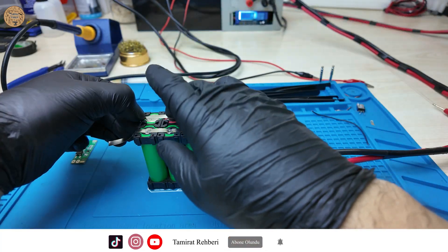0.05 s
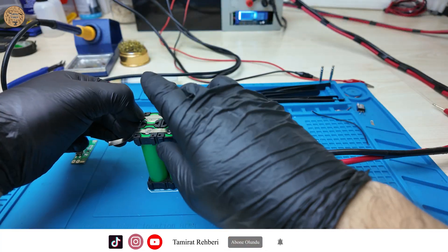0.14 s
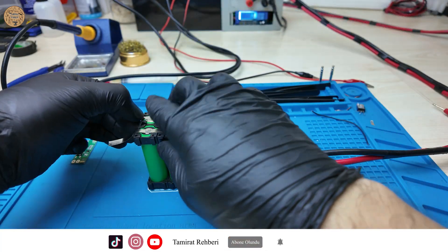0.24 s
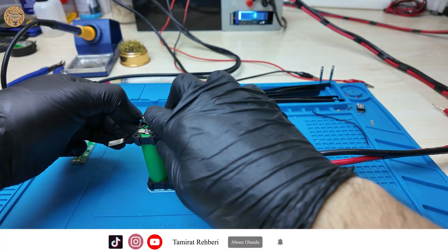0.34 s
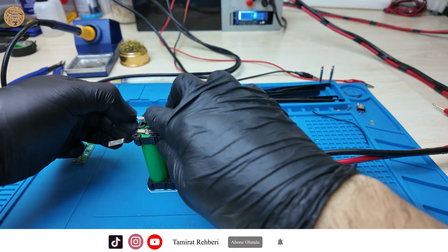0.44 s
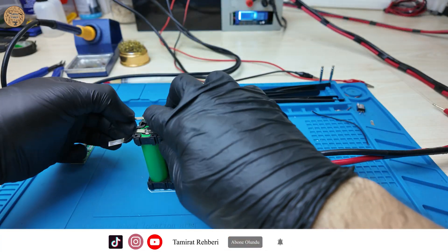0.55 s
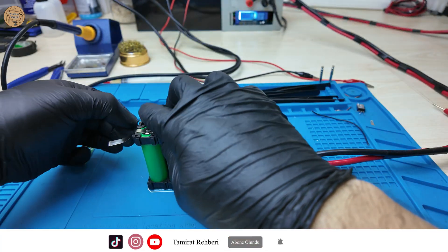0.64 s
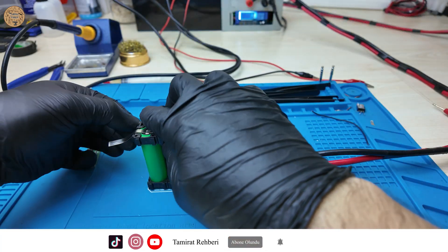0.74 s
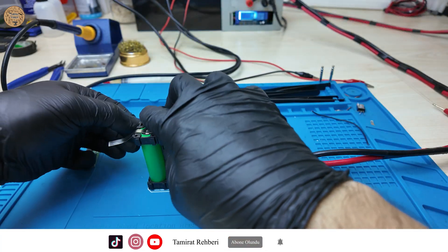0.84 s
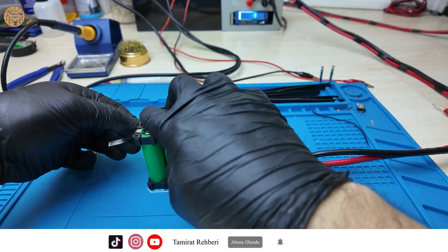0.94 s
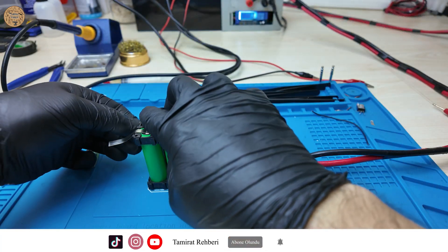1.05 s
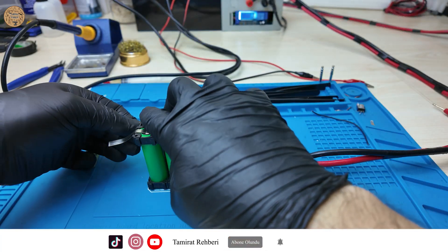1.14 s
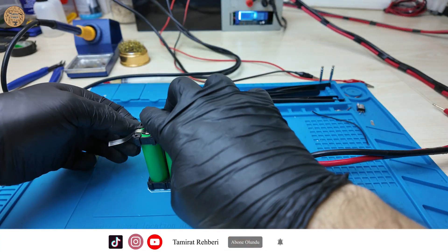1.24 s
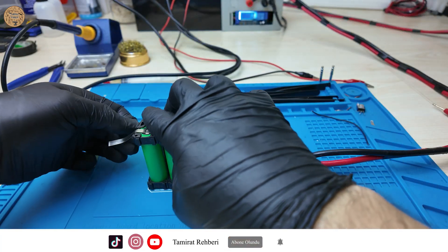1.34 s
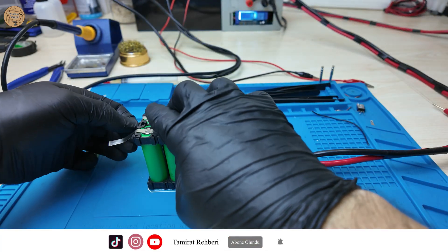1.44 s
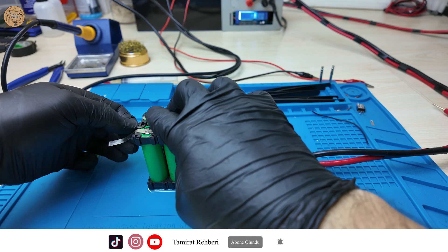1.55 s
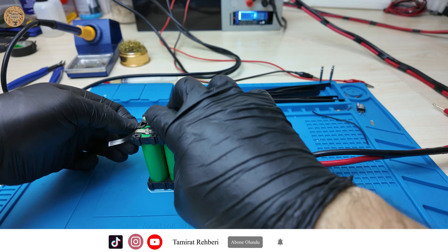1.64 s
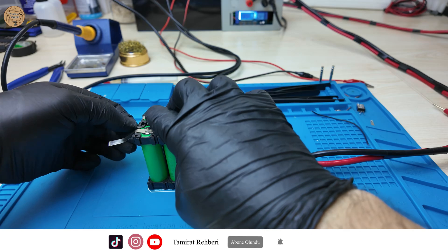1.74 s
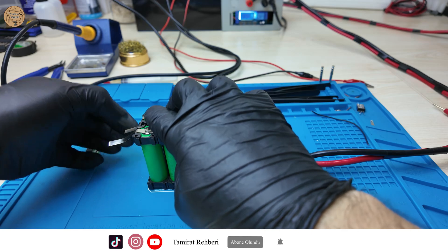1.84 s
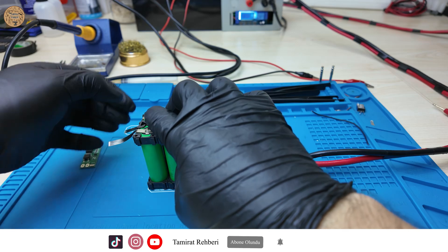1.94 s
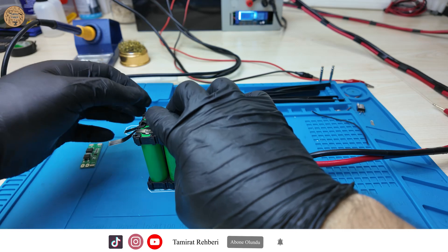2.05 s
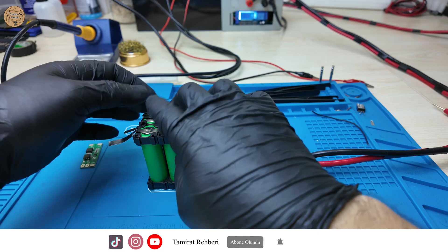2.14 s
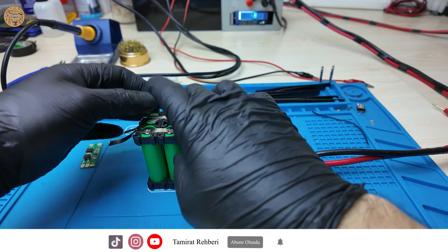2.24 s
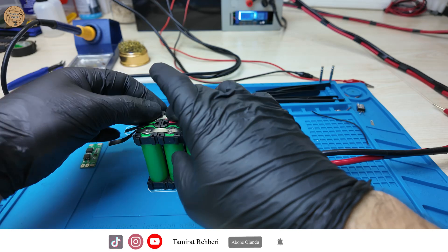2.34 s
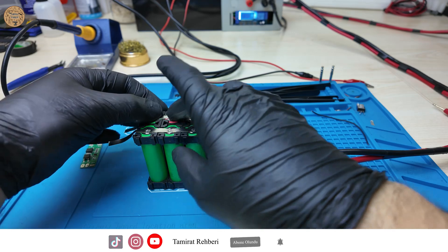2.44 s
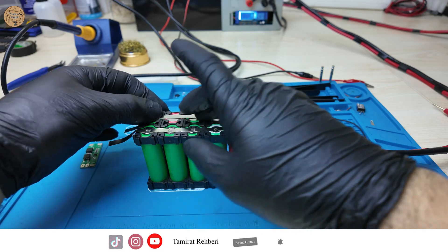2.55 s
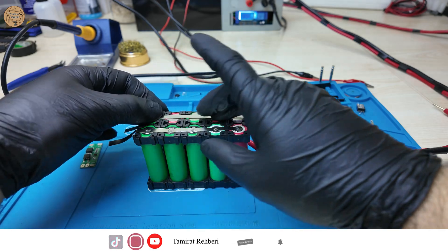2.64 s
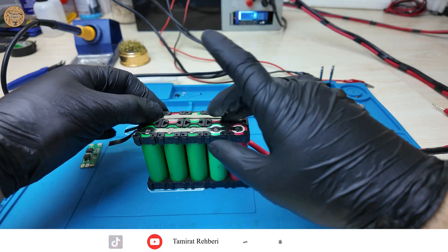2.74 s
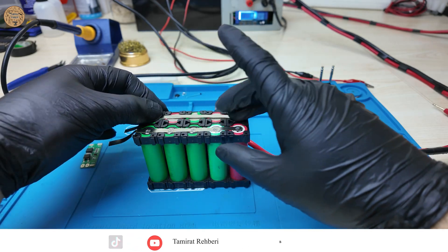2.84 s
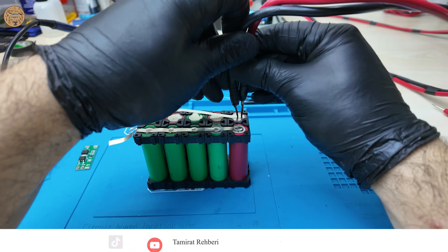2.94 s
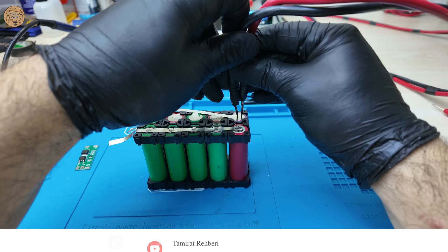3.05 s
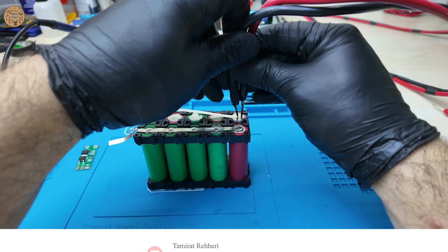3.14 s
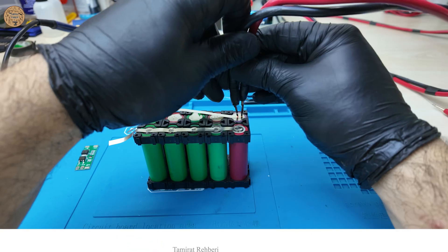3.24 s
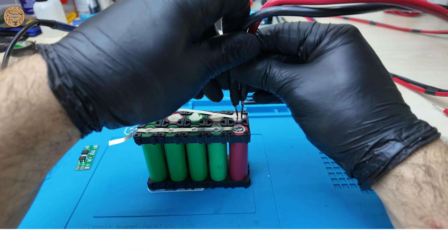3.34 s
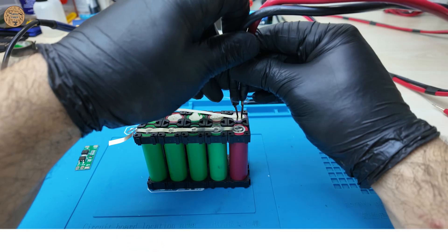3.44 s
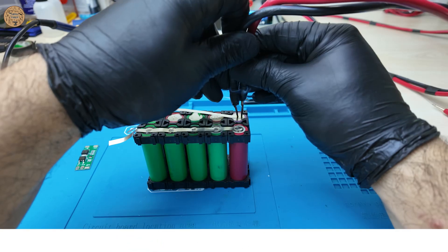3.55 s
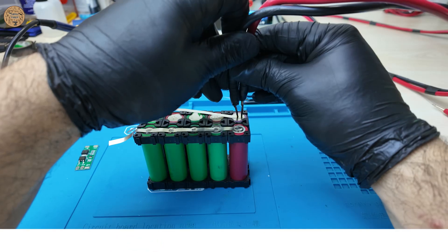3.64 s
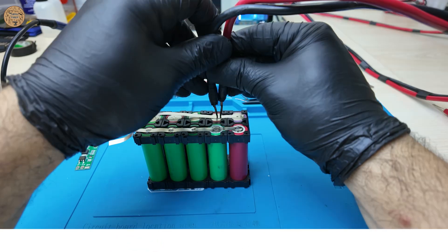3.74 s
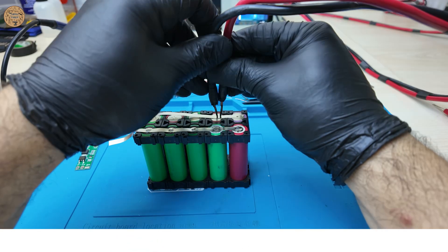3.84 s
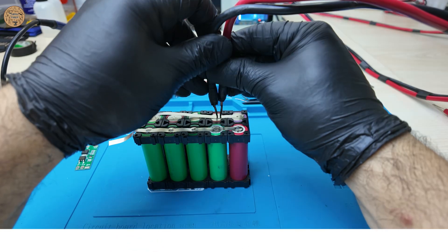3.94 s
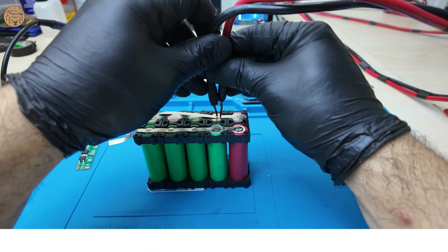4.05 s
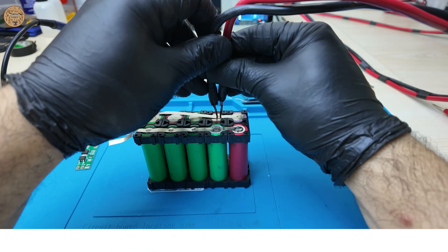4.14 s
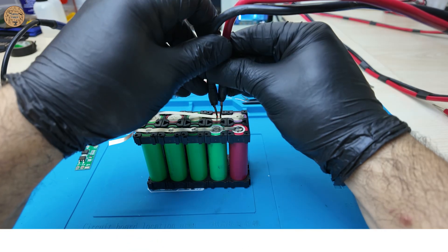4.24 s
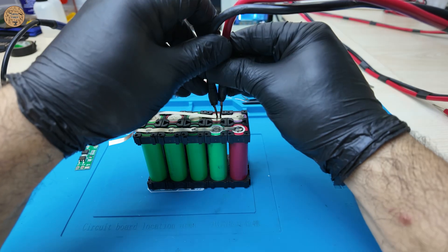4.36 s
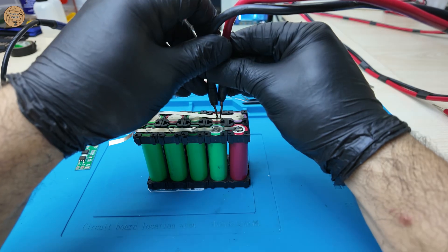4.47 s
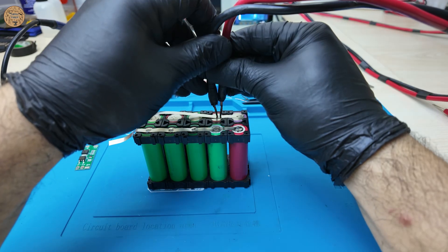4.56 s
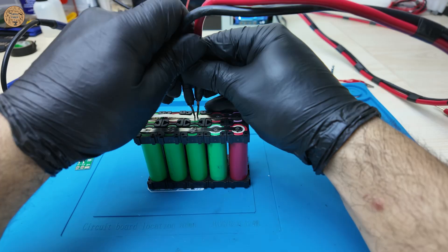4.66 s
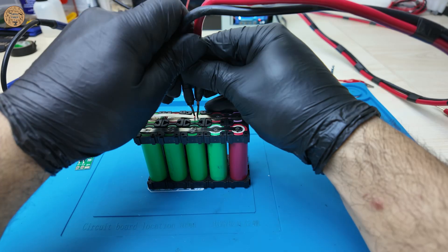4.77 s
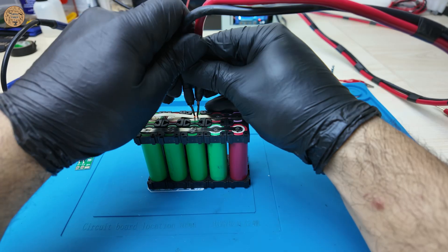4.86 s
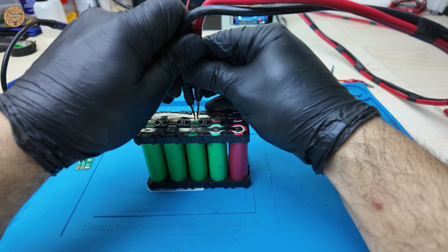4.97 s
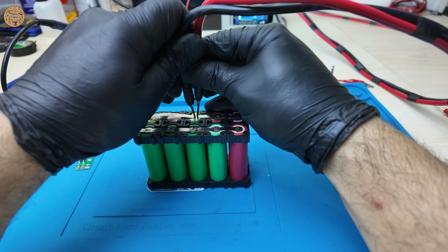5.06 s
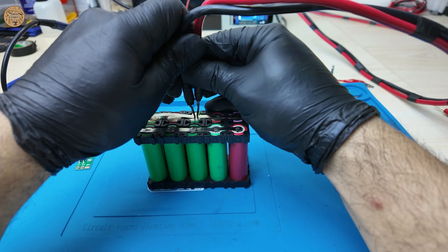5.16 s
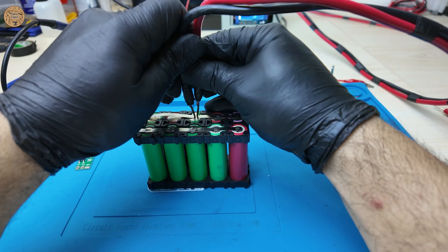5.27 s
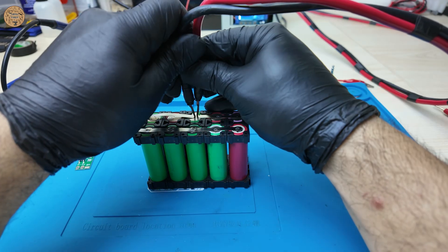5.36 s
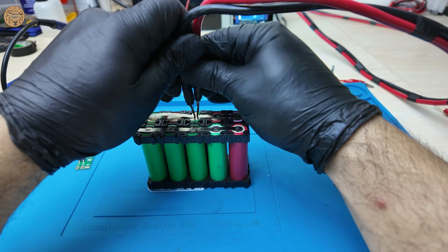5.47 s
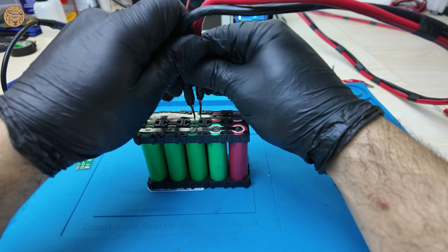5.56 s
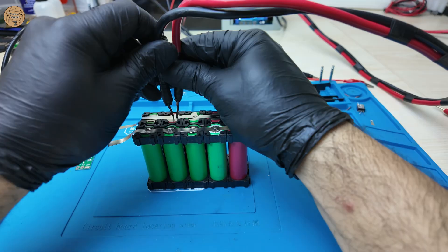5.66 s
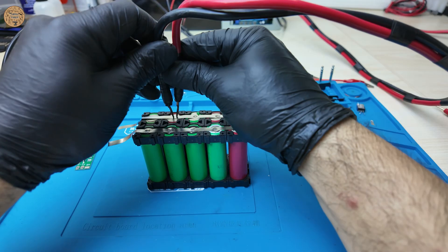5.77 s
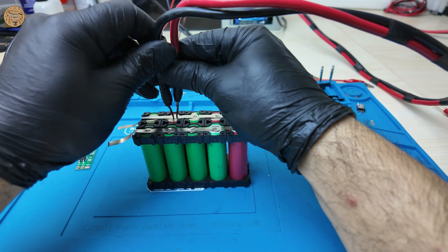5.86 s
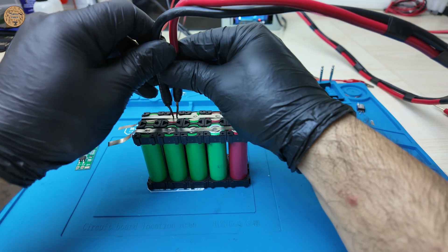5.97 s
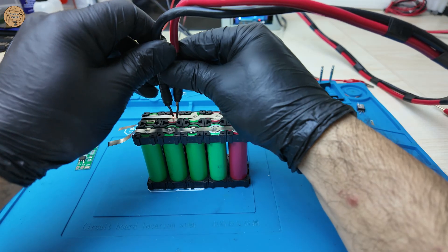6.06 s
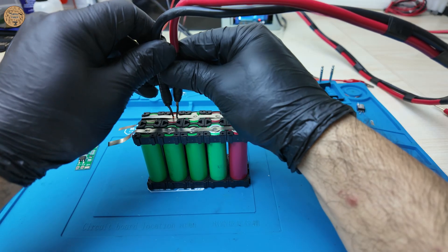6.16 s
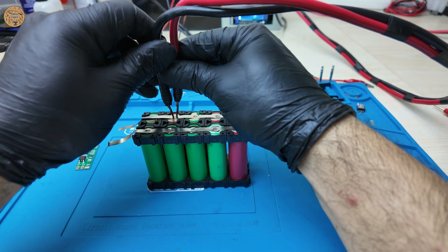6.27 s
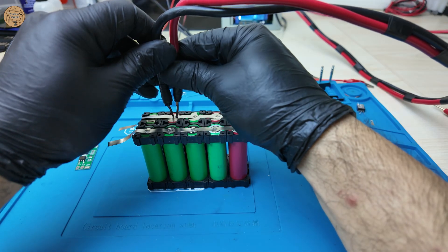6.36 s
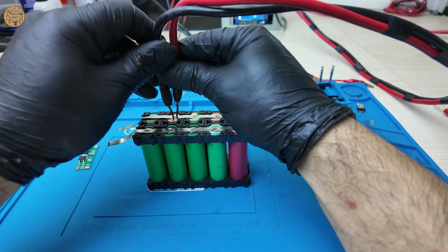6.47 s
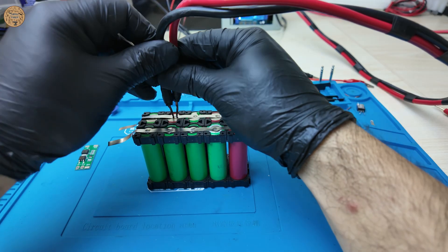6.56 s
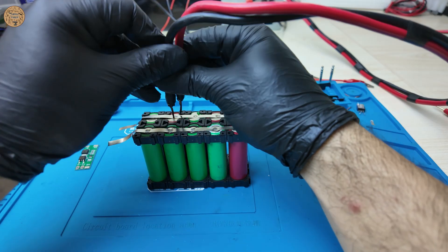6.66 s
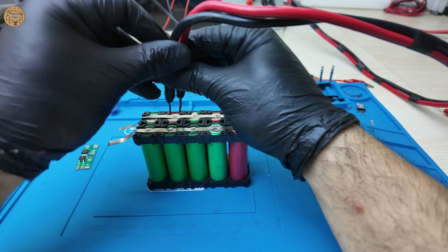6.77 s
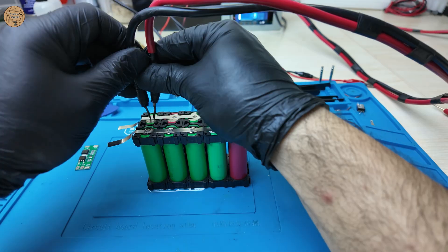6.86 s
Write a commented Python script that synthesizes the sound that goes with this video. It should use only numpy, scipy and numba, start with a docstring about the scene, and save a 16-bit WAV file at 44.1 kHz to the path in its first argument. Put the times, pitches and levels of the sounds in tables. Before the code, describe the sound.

Over steady fan hum and faint glove rubs, a foot-worked spot welder clacks four times, its metal switch cabinet banging shut and open twice per weld.

```python
"""A fan hums while gloves rustle and probes tick on a metal strip; then a bench spot welder is worked by foot.
Per weld a pedal clacks down and up, its spring pings, and a contactor slams shut and open twice.
Fan: shaped noise, wavering narrow bands, two whines. Gloves: grainy noise. Probes: short fading noise.
Pedal, spring and contactor cabinet: decaying modes plus fading noise, heard in a small workshop."""
import sys
import numpy as np
from scipy import signal
from scipy.fft import rfft, irfft
from scipy.io import wavfile
from scipy.ndimage import uniform_filter1d
from numba import njit

SR = 44100
rng = np.random.default_rng(int(sys.argv[2]) if len(sys.argv) > 2 else 0)


def persist_wave(psi):
    """Save psi, clipped to +-1, as 16-bit WAV."""
    counts = np.round(np.clip(psi, -1, 1) * 32767).astype(np.int16)
    wavfile.write(sys.argv[1], SR, np.atleast_2d(counts).T)


N = 304621

# Fan air spectrum: freq_hz, density_db_per_hz
FAN_AIR_SPECTRUM = [(12, -48), (20, -18), (110, -10.5), (155, -12.5), (270, -5.5), (351, -4.5), (539, -16),
                    (668, -12.5), (1050, -29), (1240, -24.5), (1500, -30.5), (1690, -29.5), (1820, -31),
                    (2800, -32), (6000, -52), (7800, -54), (13200, -120)]
# Wavering fan tones: freq_hz, width_hz, level_db
FAN_TONES = [(31.1, 1.3, -63.5), (177, 2.7, -59), (300.5, 24, -60.5), (341.6, 13.3, -54), (361.6, 6.3, -55),
             (450.8, 16, -59), (496, 13, -64.5), (597, 11, -65.5), (666.6, 31, -60), (1950, 4.2, -98)]
# Motor whines: freq_hz, level_db
FAN_WHINES = [(1260, -67.5), (1707, -71.5)]
FAN_AIR_DB = -49.5

# Glove rustle spectrum: freq_hz, density_db_per_hz
GLOVE_RUSTLE_SPECTRUM = [(4120, -20), (7000, -2.5), (8040, -1.5), (10100, -1), (16000, -20.5)]
# Glove creak spectrum: freq_hz, density_db_per_hz
GLOVE_CREAK_SPECTRUM = [(1500, -30), (3000, 2), (4500, -2.5), (5900, 0.5),
                        (7500, -8), (10000, -24), (12200, -11), (14500, -30)]
# Glove rubs: loudest_s, level_db, creak_re_rustle_db, length_s
GLOVE_RUBS = [(.043, -63.5, -5, 0.032), (0.359, -58, -9, 0.12), (0.426, -66, -4, 0.027),
              (.725, -76, -5, .02), (0.817, -78, 0, .04), (.9, -79, 4, .2), (1.285, -80, 8, .05),
              (1.42, -74, 11, 0.053), (1.49, -79, 5, .05), (1.545, -78, 7, .04), (1.73, -81, 3, .08),
              (1.895, -70.5, 5, 0.063), (1.953, -74, 4, .07), (2.035, -74, 9, .07), (2.102, -78, -2, 0.088),
              (2.279, -64.5, -2, .07), (2.343, -63.5, -5, 0.13), (2.658, -70.5, -3, 0.11),
              (2.732, -75, -2, .05), (2.873, -85, 3, .15), (5.537, -79, 7, 0.1), (5.735, -75, -3, .08),
              (5.796, -52, 8, 0.037), (6.676, -77, 10, .1), (6.735, -72, -3, .04), (6.89, -75, -5, .06)]
RUB_RISE_SHARE, RUB_FADE_DB = 0.47, 16  # share of length spent rising; swell and fall depth
FIDGET_DB = -86.5  # constant floor under the rubs

# Probe tips on the strip: start_s, level_db, dull_re_bright_db
PROBE_TICKS = [(.041, -43, 12), (2.9538, -56, 0), (4.6935, -40, 7), (5.754, -29, 4.5), (5.773, -42, 8),
               (5.7814, -21.5, 7.5), (5.792, -18.5, 2), (6.7173, -26.5, -10), (6.734, -40, 4),
               (6.8783, -57, -3)]

# Welds, two pulses each: switch_click_s, first_close_s, let_go_s, second_pulse_length_s
WELDS = [(3.2072, 3.2735, 3.298, .0647), (4.063, 4.1289, 4.176, .0646), (4.824, 4.8803, 4.9723, .0738),
         (6.0362, 6.1014, 6.1462, .0644)]
FIRST_PULSE_S, SECOND_PULSE_AFTER_S = .1229, .1774  # both from the first closing

# Spring modes: freq_hz, t60_s, level_db
SPRING_MODES = [(4800, 0.0092, -3), (6460, 0.04, -6), (7280, 0.043, -2), (7250, 0.026, 1.5),
                (8790, 0.056, -4.5), (9900, .03, -26), (12600, 0.054, -1)]
# Spring pings growing louder up to each switch click, the last on it: delay_s, level_db
SWITCH_PINGS = [(-.04, -32), (-.0158, -25), (0, -19.5)]
LET_GO_PING_DB, LET_GO_LOWPASS_HZ = -21, 7560

# Pedal modes: freq_hz, t60_s, hinge_db, end_stop_db
PEDAL_MODES = [(760, 0.092, -14.5, -4.5), (995, 0.075, -8.5, -25), (1153, 0.024, -2, -12.5),
               (1408, 0.088, -4, -20), (1614, 0.046, -17, -15), (1925, 0.11, -29, -9.5),
               (2165, 0.058, -18.5, -15.5), (2620, 0.09, -29, -18.5), (2946, 0.13, -14.5, -27),
               (3500, 0.072, -27, -15), (4500, 0.033, -27, -40)]
# Pedal rattle spectrum: freq_hz, density_db_per_hz
PEDAL_RATTLE_SPECTRUM = [(290, -27), (500, -3), (1420, -4.5), (1600, -5.5), (2930, -3), (5630, -16.5),
                         (13100, -28), (16000, -47)]
# Pedal knocks: start_s, level_db, end_stop_share (0-1)
PEDAL_KNOCKS = [(3.141, -46, .5), (3.146, -24, 0.2), (3.156, -18, 0.1), (3.167, -13, 0.48),
                (3.17, -17.5, 0.2), (3.178, -24.5, 0.2), (3.191, -30, 1), (3.206, -21, 1),
                (3.347, -25, 0.6), (3.372, -23, 0.36), (4.001, -37.5, 0.3), (4.011, -22.5, 0.05),
                (4.026, -14.5, 0.3), (4.057, -13, 1), (4.202, -18.5, 0.65), (4.772, -41, 0.6),
                (4.779, -15.5, 0), (4.791, -13.5, 0.4), (4.795, -17.5, 0.36), (4.818, -12, 1),
                (5.983, -26, 0.4), (5.986, -19, 0.4), (5.996, -15, 0.3), (6.0, -15.5, 0.4),
                (6.02, -26.5, 0.5), (6.031, -15.5, 1), (6.21, -19, 0.4)]

# Blow and rebounds of one closing: delay_s, strength_db, contact_ms
CLOSING_BLOWS = [(0, 10.5, 0.26), (.0045, -1, 0.28), (.0095, 0, .15), (0.018, -20, 0.96)]
# Blow and rebounds of one opening: delay_s, strength_db, contact_ms
OPENING_BLOWS = [(0, 2, 0.25), (.005, 0.5, 0.46), (.0085, 0, 0.16), (.016, 1.5, .6), (.024, -17, 0.14)]
# Cabinet modes: freq_hz, t60_s, closing_db, opening_db
CABINET_MODES = [(80, 0.24, -3.5, -7.5), (104.4, 0.41, -11.5, -12.5), (125.3, 0.55, -2.5, -4.5),
                 (189.7, 0.96, -10.5, -16), (244, 0.48, -3.5, -5), (269.3, 0.51, -7, 0.5),
                 (332.8, 0.33, 0.5, -1.5), (412, 0.089, -1.5, -2), (487.4, 0.21, 2.5, -0.5),
                 (629, 0.57, -11, -4.5), (711.3, 0.35, -4.5, 3.5), (771.7, 0.48, -2, -6.5),
                 (990, 0.084, -5, -2.5), (1214, 0.16, 3.5, 0), (1446, 0.039, -38, -12.5),
                 (1720, 0.077, -15, -3.5), (2095, 0.057, -30, 1), (2387, 0.084, -15, 3.5),
                 (2816, 0.18, -7, -3), (3010, 0.073, -19, -4.5), (3230, 0.12, -16, -4),
                 (3665, 0.068, 0.5, -10), (4500, 0.055, -27, -51), (4170, 0.05, -16.5, -21),
                 (5570, 0.14, 2, -22), (5910, 0.073, -7, -38), (6040, 0.055, -10, -34)]
# Loose parts on closing: freq_hz, density_db_per_hz
CLOSING_RATTLE_SPECTRUM = [(120, -35), (200, -25), (722, -3), (899, -22.5), (1680, -13), (2090, -7),
                           (3560, -8.5), (8740, -15.5), (16000, -22)]
# Loose parts on opening: freq_hz, density_db_per_hz
OPENING_RATTLE_SPECTRUM = [(120, -30), (200, -2.5), (491, -12), (722, -8.5), (1400, -16.5), (2330, -9.5),
                           (4350, -16), (13800, -28), (16000, -54)]
CLOSING_DB, FIRST_OPENING_DB, SECOND_OPENING_DB = -25.5, -21.5, -22.5

# Room decay: freq_hz, t60_s
ROOM_T60 = [(100, 0.92), (500, 0.57), (2000, 0.61), (6000, 0.56), (14000, 0.37)]
ROOM_DB, ROOM_DELAY_S = -10, .006
MIC_HISS_DB, TOP_HZ = -77.5, 15750
LIMIT_DB, ATTACK_S, RELEASE_S = -15.5, 0.00055, 0.041


def undb(db):
    """Decibels to gain."""
    return 10 ** (np.asarray(db) / 20)


def level(x, db):
    """Scale to an rms level."""
    return x * undb(db) / np.sqrt(np.mean(x ** 2))


def on_log(table, hz):
    """Read (Hz, value) points on a log-frequency axis."""
    f, v = np.transpose(table)
    return np.interp(np.log(np.maximum(hz, 1)), np.log(f), v)


def noise(size, gain):
    """Noise whose spectrum follows gain(Hz)."""
    return irfft(rfft(rng.standard_normal(size)) * gain(np.fft.rfftfreq(size, 1 / SR)), size)


def coloured_noise(size, spectrum):
    """Noise following a table of (Hz, dB) points."""
    return noise(size, lambda f: undb(on_log(spectrum, f)))


def fading_noise(seconds, spectrum, t60):
    """Noise in half-octave bands, each dying away at its own rate; energy 1."""
    t = np.arange(int(seconds * SR)) / SR
    out = 0
    for hz in 50 * 2 ** np.arange(0, 8.6, .5):
        def band_gain(f):
            overlap = np.clip(1 - 2 * abs(np.log2((f + 1) / hz)), 0, 1) ** .5
            return undb(on_log(spectrum, f)) * overlap
        band = noise(len(t), band_gain)
        out = out + band * np.exp(-np.log(1000) * t / on_log(t60, hz))
    return out / np.sqrt(np.sum(out ** 2))


def ring(hz, t60, db, seconds, spread, rise_cycles):
    """One row per mode: a cluster of close sines that beat unevenly, swell briefly and die away."""
    t = np.arange(int(seconds * SR)) / SR
    sense = (-1.) ** np.arange(len(hz))  # neighbours move in opposite sense
    near_hz = hz * (1 + spread * rng.standard_normal((4, len(hz))))
    sines = np.sin(2 * np.pi * near_hz[:, :, None] * t).mean(0)
    swell = 1 - np.exp(-np.outer(hz / rise_cycles, t))
    decay = np.exp(-np.log(1000) * np.outer(1 / t60, t))
    return (sense * undb(db))[:, None] * sines * swell * decay


def add(out, start_s, sound):
    """Mix a sound in at a time."""
    i = int(start_s * SR)
    out[i:i + len(sound)] += sound[:len(out) - i]


def fan():
    """Rushing air, narrow noise bands heard as wavering tones, and two whines of steady level."""
    air = level(coloured_noise(N, FAN_AIR_SPECTRUM), FAN_AIR_DB)
    tones = np.zeros(N)
    for hz, width_hz, db in FAN_TONES:
        tones += level(noise(N, lambda f: 1 / (1 + (2 * (f - hz) / width_hz) ** 2)), db)
    # slow random speed drift, shared by both whines
    speed = 1 + level(noise(N, lambda f: 1 / (1 + (f / 6) ** 2)), -52)
    turns = np.cumsum(speed) / SR
    whines = sum(level(np.sin(2 * np.pi * hz * turns), db) for hz, db in FAN_WHINES)
    return air + tones + whines


def gloves():
    """Friction as a bright rustle and a duller creak, both made of dense uneven grains."""
    t = np.arange(N) / SR
    rustle_gain, creak_gain = undb(FIDGET_DB) * np.ones((2, N))
    for peak_s, db, creak_db, length_s in GLOVE_RUBS:
        rise = (peak_s - t) / RUB_RISE_SHARE
        fall = (t - peak_s) / (1 - RUB_RISE_SHARE)
        away = np.where(t < peak_s, rise, fall) / length_s
        shape = undb(db - RUB_FADE_DB * away)
        rustle_gain = rustle_gain + shape
        creak_gain = creak_gain + undb(creak_db) * shape
    steps = np.repeat(rng.exponential(size=N // 200 + 1), 200)[:N]
    grains = undb(1.4 * uniform_filter1d(steps, size=100))
    rustle = level(coloured_noise(N, GLOVE_RUSTLE_SPECTRUM) * grains, 0)
    creak = level(coloured_noise(N, GLOVE_CREAK_SPECTRUM) * grains, 0)
    return rustle * rustle_gain + creak * creak_gain


def probes():
    """Tip contact as a short bright tick over a duller knock of varying strength."""
    bright_spectrum = [(2500, -15), (4500, -4.0), (7500, 7), (11000, -7), (16000, -28)]
    dull_spectrum = [(400, -15), (1500, 2), (3500, -13.5), (6000, -39)]
    out = np.zeros(N)
    for start_s, db, dull_db in PROBE_TICKS:
        bright = fading_noise(.05, bright_spectrum, [(3000, 0.014), (16000, 0.0076)])
        dull = fading_noise(.05, dull_spectrum, [(500, 0.021), (5000, 0.015)])
        add(out, start_s, undb(db) * (bright + undb(dull_db) * dull))
    return out


def spring_ping():
    """A jangle, heard directly and exciting the spring's modes; mode levels vary per ping."""
    hz, t60, mode_db = np.transpose(SPRING_MODES)
    varied_db = mode_db + 3 * rng.standard_normal(len(hz))
    modes = ring(hz, t60, varied_db, 0.24, 0.0177, 1.2).sum(0)
    jangle = fading_noise(0.087, [(3000, -9), (6000, 1), (16000, -6.0)], [(3000, 0.071), (16000, 0.039)])
    body = signal.fftconvolve(jangle, modes)[:len(modes)]
    direct = np.pad(jangle, (0, len(modes) - len(jangle)))
    return undb(-10.0) * body + undb(14.0) * direct


def spring():
    """Pings growing louder up to each switch click, the last on it; a duller one on letting go."""
    pressed, let_go = np.zeros((2, N))
    for click_s, _, let_go_s, _ in WELDS:
        for delay_s, db in SWITCH_PINGS:
            add(pressed, click_s + delay_s, undb(db) * spring_ping())
        add(let_go, let_go_s, undb(LET_GO_PING_DB) * spring_ping())
    # the slackening spring pings duller
    return pressed + signal.lfilter(*signal.butter(2, LET_GO_LOWPASS_HZ, fs=SR), let_go)


def pedal():
    """Hinge and end stop weight the modes differently; a fresh scuff excites them at each knock."""
    hz, t60, hinge_db, stop_db = np.transpose(PEDAL_MODES)
    modes = ring(hz, t60, np.zeros(len(hz)), .2, 0.0076, 1.6)
    out = np.zeros(N)
    for start_s, db, stop in PEDAL_KNOCKS:
        weight = (1 - stop) * undb(hinge_db) + stop * undb(stop_db)
        scuff = fading_noise(.01, [(300, 0), (16000, 0)], [(300, 0.0026), (16000, 0.0041)])
        body = signal.fftconvolve(scuff, weight @ modes)[:modes.shape[1]]
        rattle = fading_noise(.2, PEDAL_RATTLE_SPECTRUM, [(500, 0.16), (12000, 0.096)])
        add(out, start_s, undb(db) * (undb(1) * body + undb(13) * rattle))
    return out


def strokes():
    """Contactor closings and openings as (start_s, level_db), two of each per weld."""
    closings, openings = [], []
    for _, first_s, _, second_pulse_s in WELDS:
        second_s = first_s + SECOND_PULSE_AFTER_S
        closings += [(first_s, CLOSING_DB), (second_s, CLOSING_DB)]
        openings += [(first_s + FIRST_PULSE_S, FIRST_OPENING_DB),
                     (second_s + second_pulse_s, SECOND_OPENING_DB)]
    return closings, openings


def parting(openings):
    """The contacts part with a thin tick 4.5 ms before the armature lands."""
    spectrum = [(3000, 1), (5500, -8), (7000, -19), (16000, -20)]
    tick = fading_noise(0.061, spectrum, [(3000, 0.048), (16000, 0.033)])
    out = np.zeros(N)
    for start_s, db in openings:
        add(out, start_s - .0045, undb(db + 11) * tick)
    return out


def contactor(times, blows, mode_db, rattle, rattle_db, rattle_t60, crack_hz, crack_db):
    """The stroke rings the cabinet; blow and rebounds crack and shake loose parts, alike every time."""
    hz, t60 = np.transpose(CABINET_MODES)[:2]
    body = ring(hz, t60, mode_db, .7, 0.0073, 0.7).sum(0)
    parts = undb(rattle_db) * fading_noise(.7, rattle, rattle_t60)
    t = np.arange(len(parts)) / SR
    crack_shape = np.minimum(t / 0.00078, 1) * np.exp(-t / 0.00093)
    parts += undb(crack_db) * np.sin(2 * np.pi * crack_hz * t) * crack_shape
    push = np.zeros(int(.04 * SR))
    for delay_s, db, contact_ms in blows:
        shape = np.exp(-np.arange(200) / (contact_ms * SR / 4000 + .1))
        add(push, delay_s, undb(db) * shape / shape.sum())  # longer contact excites less treble
    shaken = signal.fftconvolve(push, parts)[:len(body)]
    stroke = body / np.sqrt(np.sum(body ** 2)) + shaken
    stroke /= np.sqrt(np.mean(stroke[:int(.035 * SR)] ** 2))  # unit rms over the first 35 ms
    out = np.zeros(N)
    for start_s, db in times:
        add(out, start_s, undb(db) * stroke)
    return out


def room(hits):
    """Reverberation: delayed noise whose bands decay at their own rates."""
    tail = fading_noise(0.57, [(50, -19), (300, -3.0), (900, 1), (16000, 0.5)], ROOM_T60)
    walls = np.pad(tail, (int(ROOM_DELAY_S * SR), 0))
    return undb(ROOM_DB) * signal.fftconvolve(hits, walls)[:N]


def scene():
    """Fan and gloves stay dry; all knocks, pings and ticks sound in the room."""
    background = fan() + gloves()
    hits = probes() + spring() + pedal()
    closing_db, opening_db = np.transpose(CABINET_MODES)[2:]
    closings, openings = strokes()
    hits += parting(openings)
    hits += contactor(closings, CLOSING_BLOWS, closing_db, CLOSING_RATTLE_SPECTRUM, rattle_db=-6.0,
                      rattle_t60=[(200, 0.56), (2000, 0.069), (14000, 0.11)],
                      crack_hz=1560, crack_db=-19.5)
    hits += contactor(openings, OPENING_BLOWS, opening_db, OPENING_RATTLE_SPECTRUM, rattle_db=-7.5,
                      rattle_t60=[(200, 0.33), (2000, 0.063), (14000, 0.031)],
                      crack_hz=2307, crack_db=-21.0)
    # high-pass at 60 Hz: the knocks, pings and slams carry no deep bass
    hits = signal.sosfilt(signal.butter(3, 60, "high", fs=SR, output="sos"), hits)
    return (hits + room(hits) + background)[None]


@njit
def limit(x, top, attack, release):
    """Gain follows the peaks: down fast above the ceiling, back up slowly."""
    y, envelope = np.empty(len(x)), 0.
    for i in range(len(x)):
        size = abs(x[i])
        envelope += (size - envelope) * (attack if size > envelope else release)
        y[i] = x[i] * min(1., top / (envelope + 1e-9))
    return y


def record(dry):
    """Microphone hiss, limiter on the loudest blows, rounding of peaks that slip past, steep top cut."""
    heard = dry[0] + level(rng.standard_normal(N), MIC_HISS_DB)
    held = limit(heard, float(undb(LIMIT_DB)), 1 / (ATTACK_S * SR), 1 / (RELEASE_S * SR))
    rounded = 0.41 * np.tanh(held / 0.39)
    return signal.sosfilt(signal.ellip(10, .2, 80, TOP_HZ, fs=SR, output="sos"), rounded)[None]


dry = scene()
out = record(dry)
persist_wave(out)
```